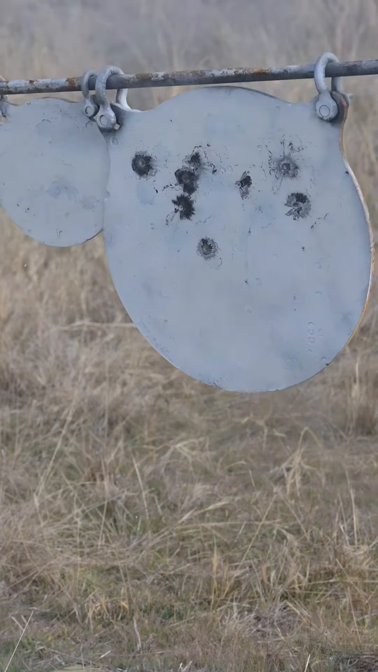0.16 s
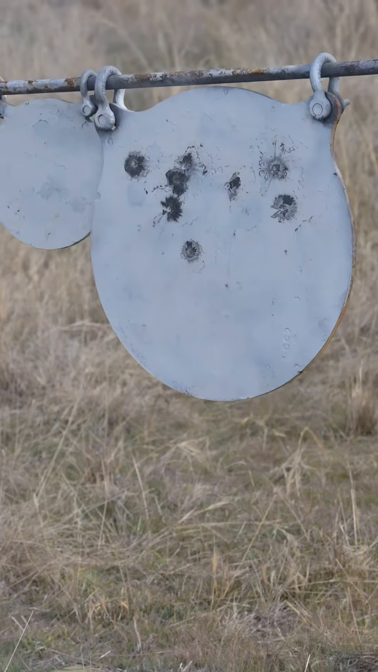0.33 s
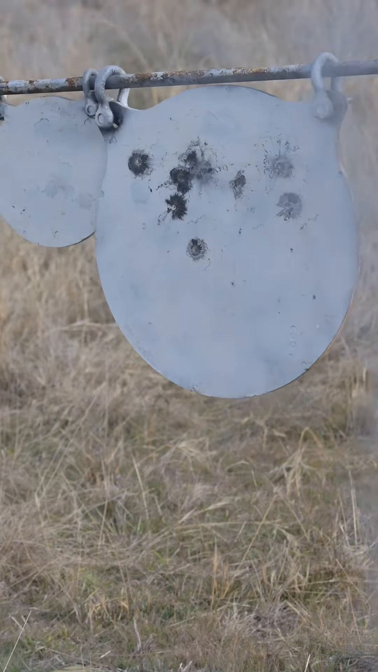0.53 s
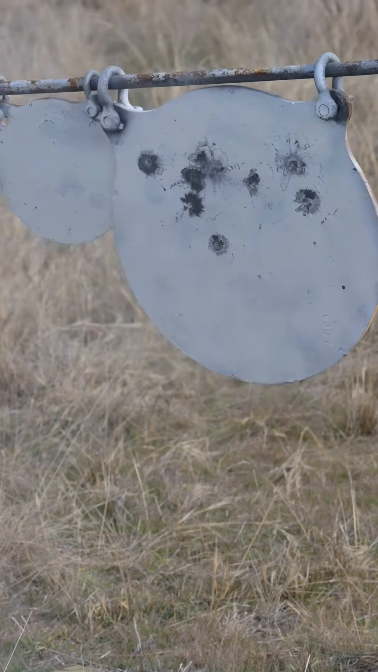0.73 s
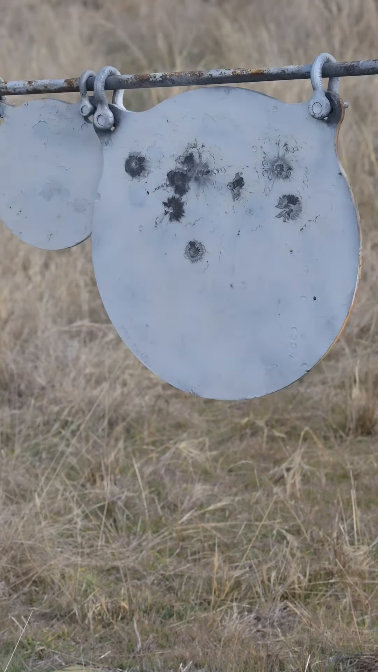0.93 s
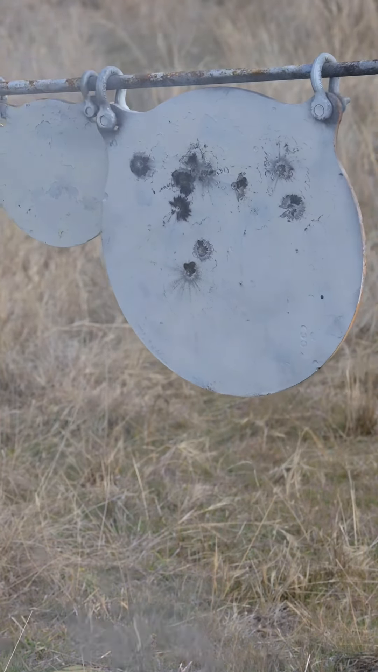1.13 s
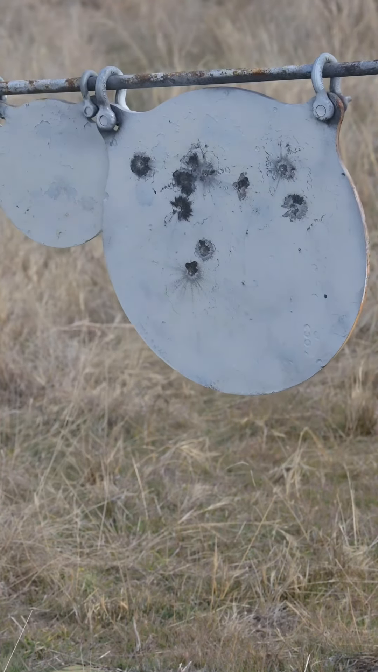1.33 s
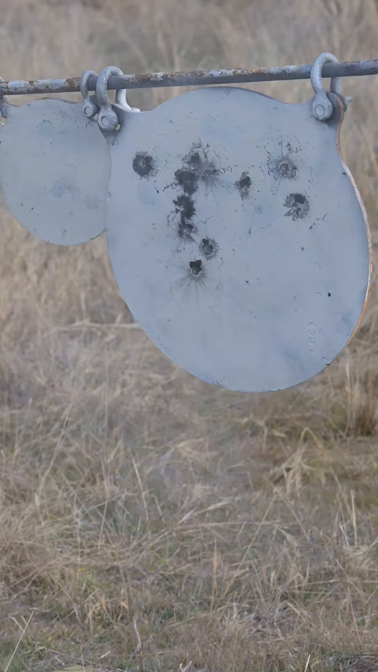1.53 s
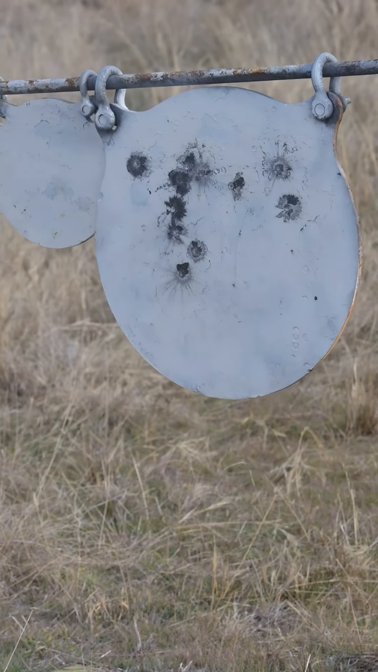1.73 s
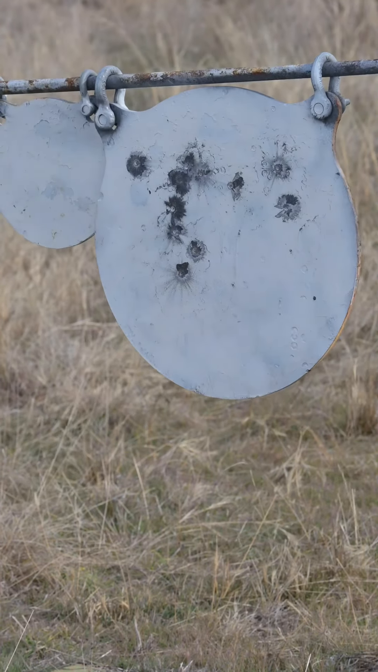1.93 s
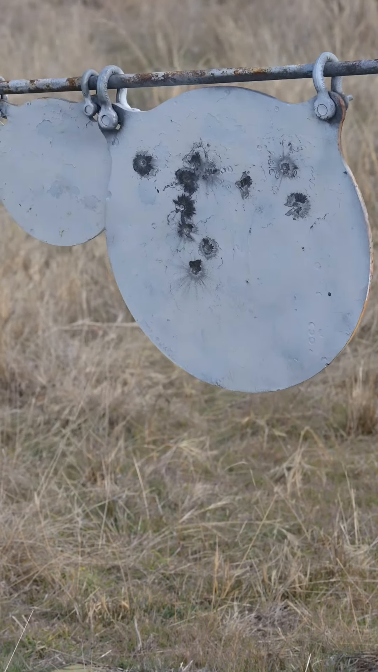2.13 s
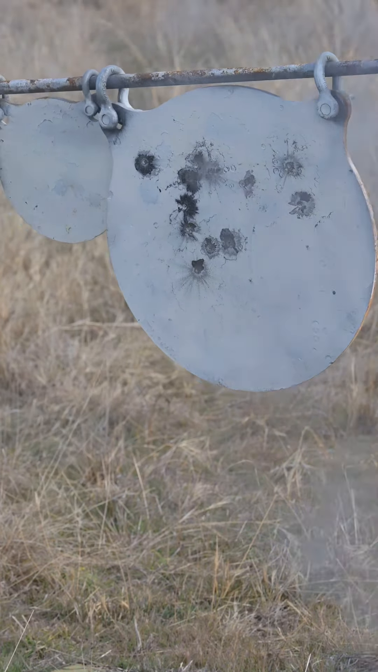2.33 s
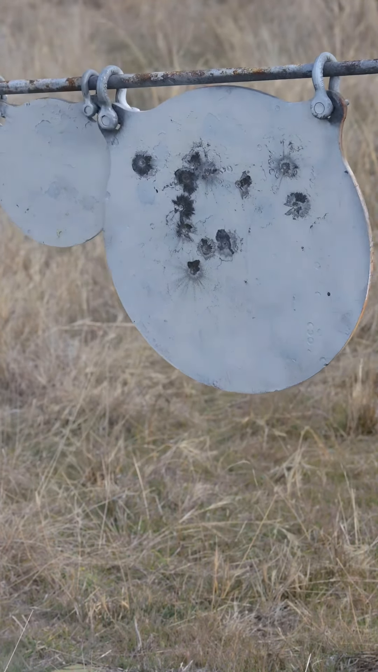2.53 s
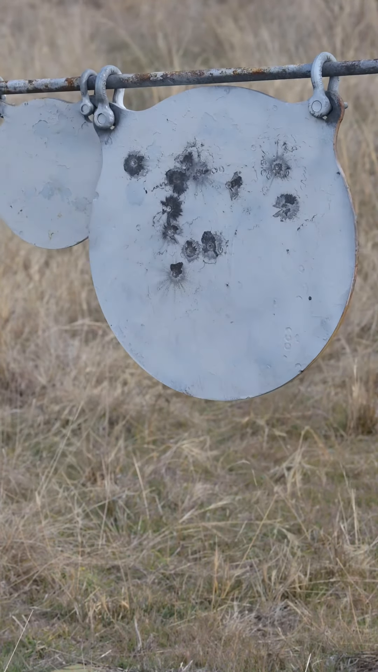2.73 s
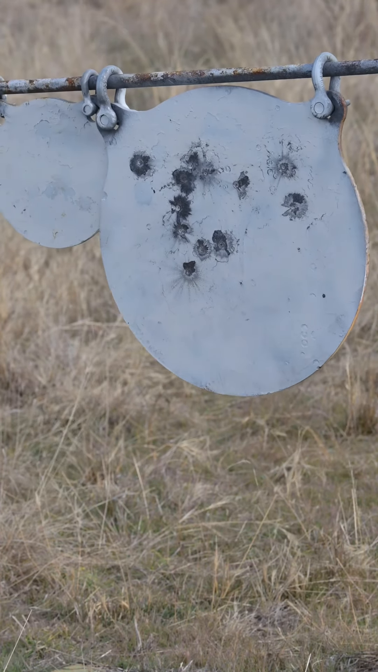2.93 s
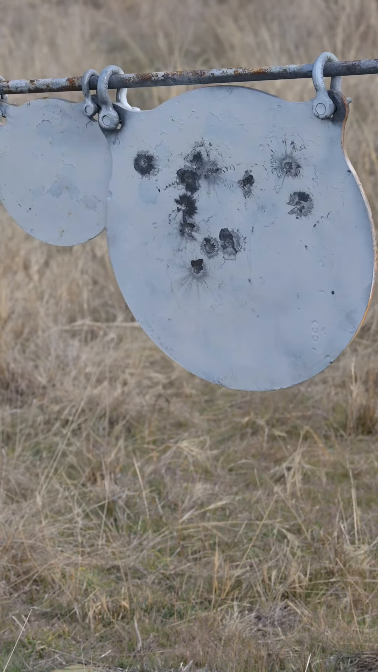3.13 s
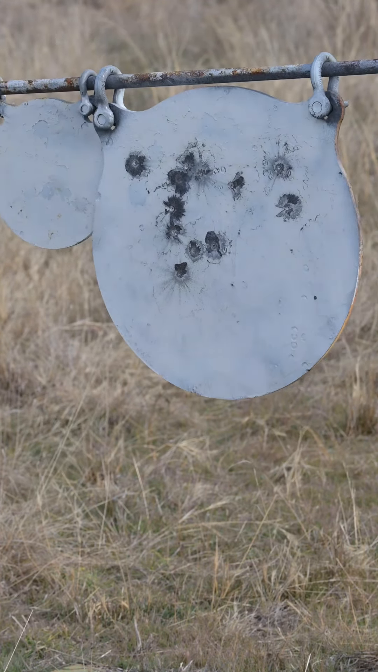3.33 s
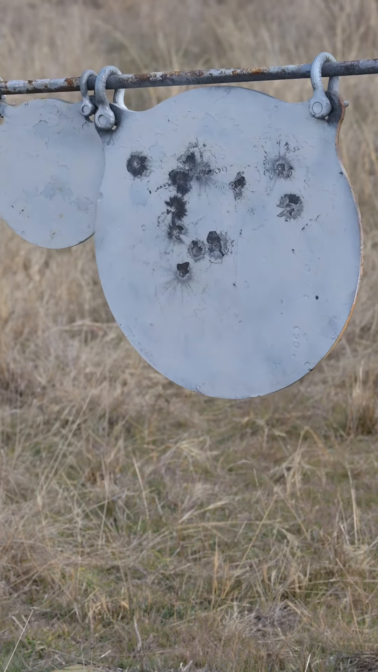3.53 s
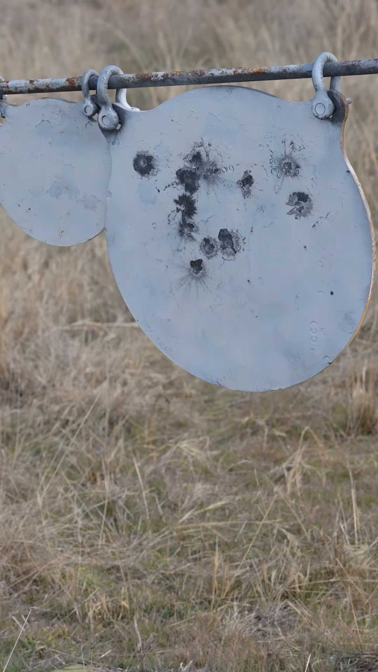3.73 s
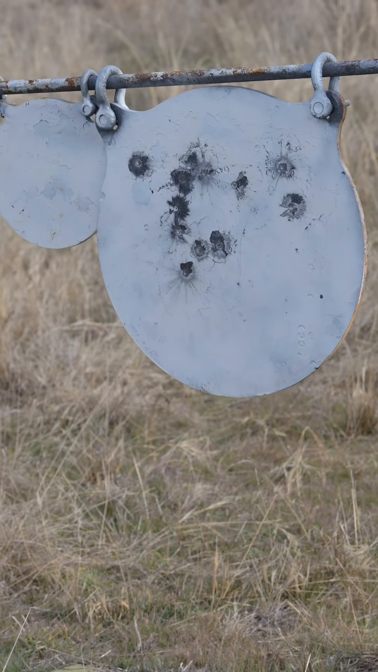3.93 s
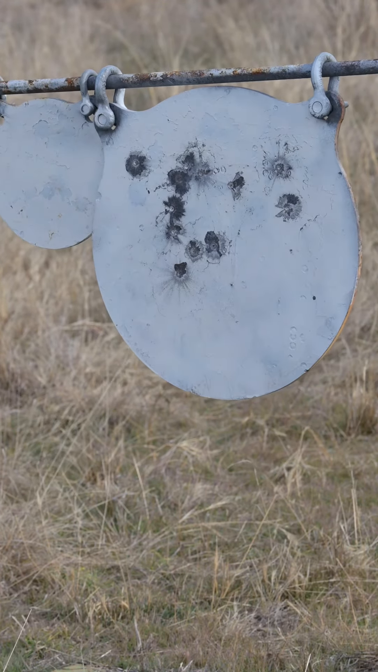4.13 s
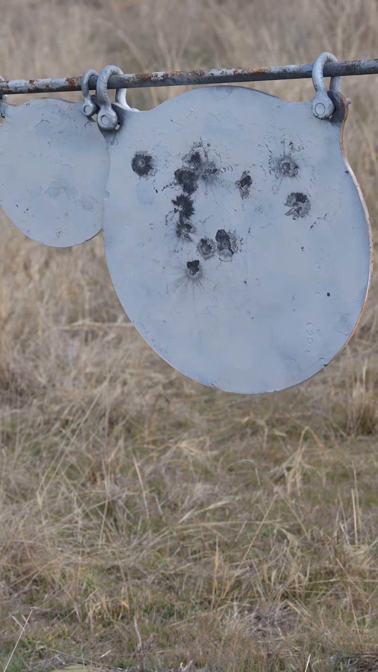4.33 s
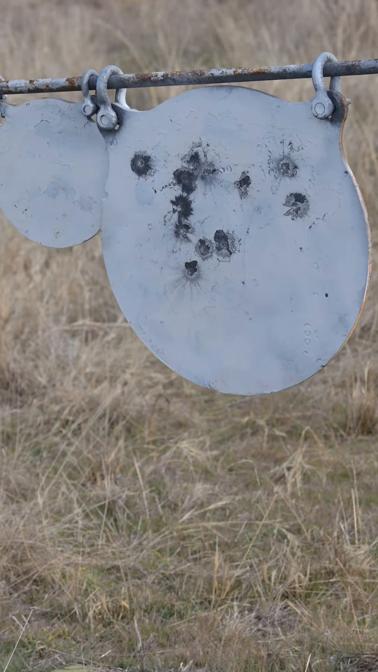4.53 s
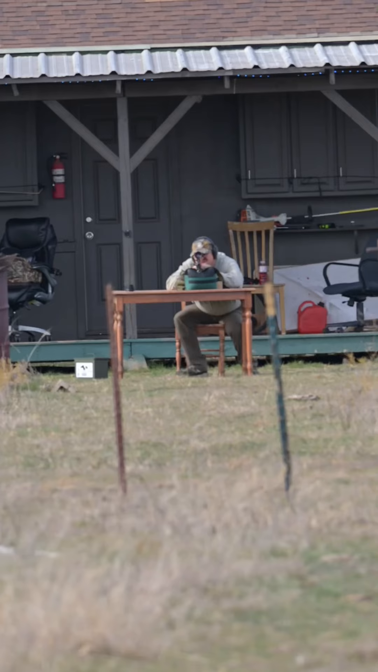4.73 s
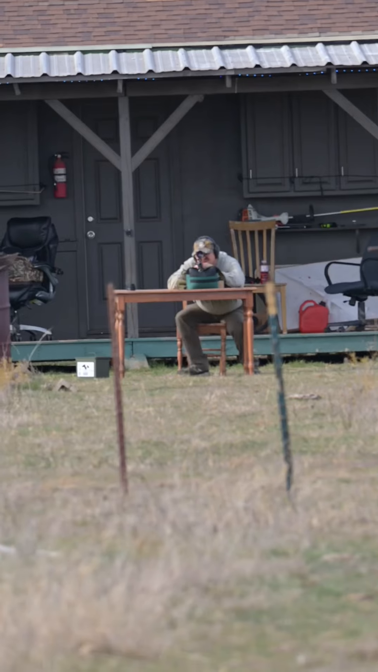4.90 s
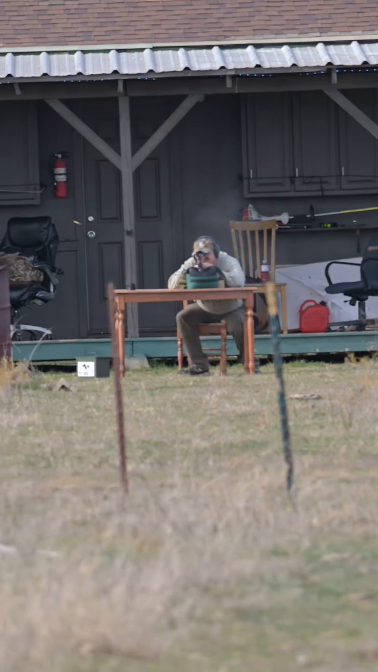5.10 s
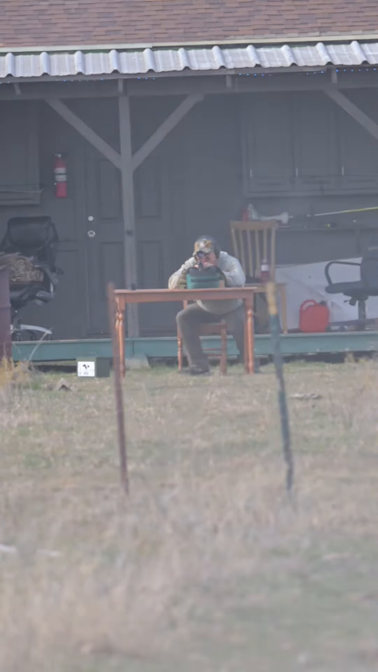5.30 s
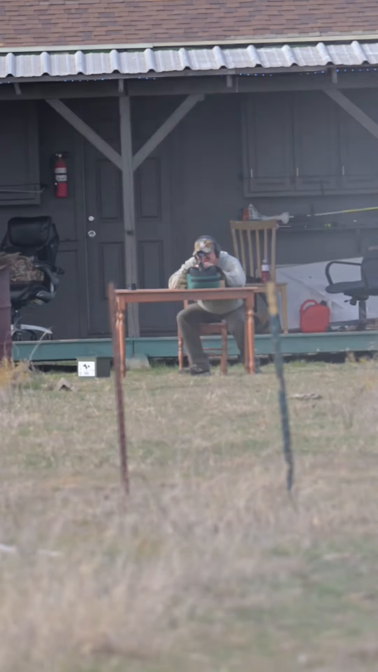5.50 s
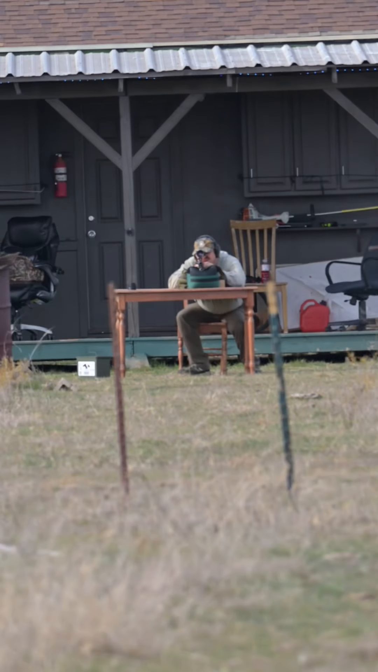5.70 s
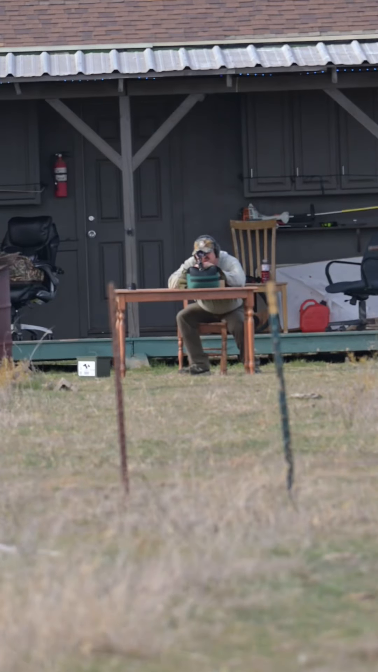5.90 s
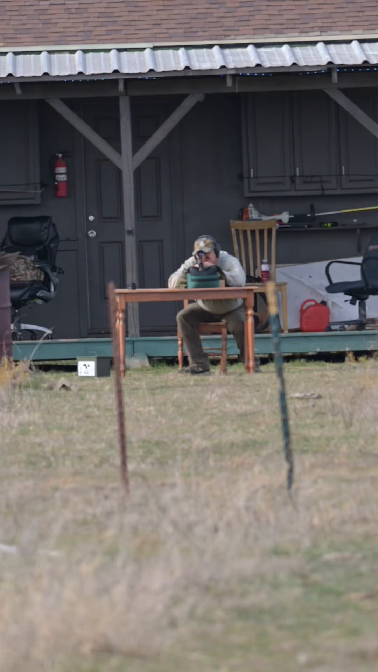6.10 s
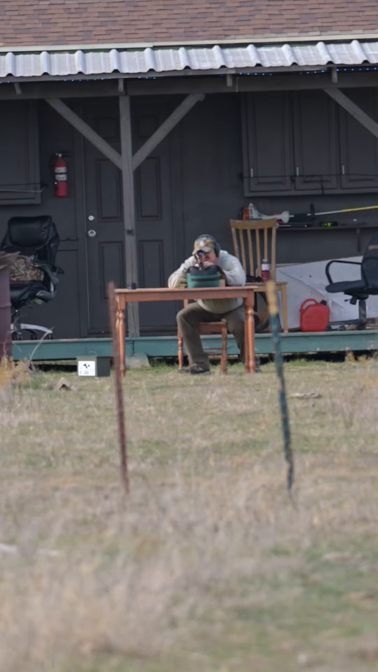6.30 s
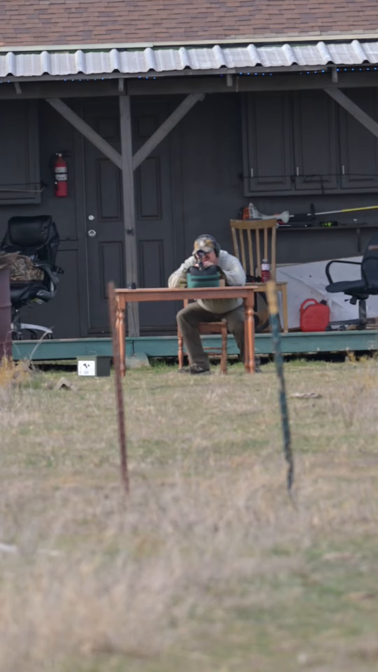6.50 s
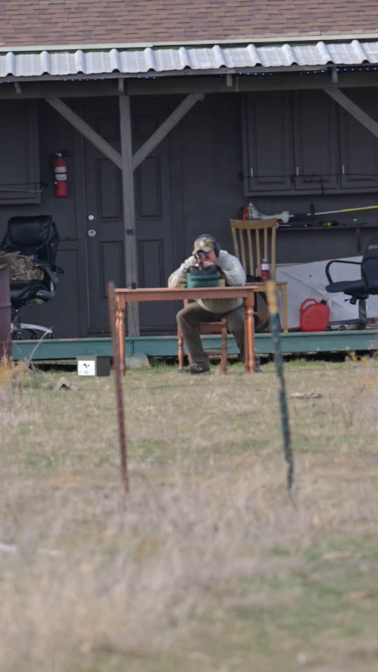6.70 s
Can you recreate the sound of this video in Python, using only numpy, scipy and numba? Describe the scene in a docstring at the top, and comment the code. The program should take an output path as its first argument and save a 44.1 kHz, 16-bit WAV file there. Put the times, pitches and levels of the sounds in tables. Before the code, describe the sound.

Close to hanging steel, supersonic cracks and bright metallic pings in quick string, shackles rattling, then a brief fade and one last long-ringing shot in wind.

```python
"""Rifle bullets on a hanging steel plate

Bullets strike a plate hung on shackles near a camera: shock-wave crack and lead splash are shaped noise and pulses,
the ring is a sum of decaying modes, and the far muzzle report follows with echoes.
The plate clanks in its shackles, fragments patter down, and low rumble and wind lie behind.
Hits overload the camera, whose gain control ducks and recovers, so the ring swells before it fades.
The background fades out and back in at a cut to another scene, windier, with one more hit.
"""
import sys
import numpy as np
from scipy import signal
from scipy.fft import rfft, irfft, next_fast_len
from scipy.io import wavfile
from scipy.ndimage import uniform_filter1d, map_coordinates
from numba import njit

SR = 44100
rng = np.random.default_rng(int(sys.argv[2]) if len(sys.argv) > 2 else 0)


def store_pcm(level_fs):
    """Save levels as 16-bit WAV."""
    pcm = np.round(np.clip(level_fs, -1, 1) * 32767).astype(np.int16)
    wavfile.write(sys.argv[1], SR, np.atleast_2d(pcm).T)


N = 297675
TIME = np.arange(N) / SR
AGE = TIME[:2 * SR]  # seconds since the onset of a sound
CUT_S = 4.81  # the cut between two scenes, where the background is faded out


def amp(db):
    """Level law: decibels to amplitude ratio."""
    return 10 ** (np.asarray(db) / 20)


def unit(x):
    """Normalization: x scaled to rms 1."""
    return x / np.sqrt(np.mean(x ** 2) + 1e-20)


def along(points, hz):
    """Logarithmic pitch scale: (Hz, value) points interpolated over log frequency."""
    f, v = np.transpose(points)
    return np.interp(np.log(hz + 1), np.log(f + 1), v)


def fade(t, t60):
    """Exponential decay: a loss of 60 dB in t60 seconds."""
    return np.exp(-np.log(1000) * t / t60)


def filtered(x, response):
    """Linear filtering: the spectrum of x times a response of frequency."""
    n = x.shape[-1]
    padded = next_fast_len(n + SR // 10)
    spectrum = rfft(x, padded) * response(np.fft.rfftfreq(padded, 1 / SR))
    return irfft(spectrum, padded)[..., :n]


def noise(spectrum, size):
    """Spectral shaping: white noise coloured by (Hz, dB) points, at rms 1."""
    return unit(filtered(rng.standard_normal(size), lambda hz: amp(along(spectrum, hz))))


def wobble(rate):
    """Slow random modulation: a smooth curve through random knots, rate of them a second."""
    return map_coordinates(rng.standard_normal(N // 100), [TIME * rate])


def add(track, s, sound):
    """Superposition: mix a sound into the track from time s."""
    start = max(round(s * SR), 0)
    track[start:start + len(sound)] += sound[:N - start]


def modes(hz, db, t60, t):
    """Modal synthesis: one decaying sine a row, at random phase."""
    phase = rng.uniform(0, 2 * np.pi, (len(hz), 1))
    return amp(db)[:, None] * fade(t, t60[:, None]) * np.sin(2 * np.pi * hz[:, None] * t + phase)


def cluster(hz, spectrum, scatter_db=5):
    """Modal density: one second of many undamped modes at random strengths, rms 1."""
    lines = np.zeros(SR // 2 + 1, complex)
    strength = amp(along(spectrum, hz) + scatter_db * rng.standard_normal(len(hz)))
    lines[hz.astype(int)] = strength * np.exp(2j * np.pi * rng.random(len(hz)))
    return unit(irfft(lines))


# Relative spectra of the low outdoor rumble and of the tree wind in the first scene and in the windier second scene.
# Each row: frequency in Hz, density in dB per Hz.
RUMBLE_SPECTRUM = [(13, -28.5), (22, 5), (108, 3), (160, -1), (247, -4.5), (309, -5.5), (420, -12),
                   (550, -40.5), (920, -120)]
CALM_SPECTRUM = [(210, -25), (350, -3.5), (424, -35), (445, -8.5), (482, -14), (719, -11.5), (791, -13),
                 (3730, -39.5), (11800, -37.5), (16000, -40.5)]
BREEZE_SPECTRUM = [(180, -86), (300, -58), (372, -17.5), (555, -17.5), (614, -6), (749, -8.5),
                   (1280, -12.5), (1970, -29.5), (3830, -37), (4160, -45), (6960, -40), (16000, -42.5)]


def air(rumble_db=-54, calm_db=-54.5, breeze_db=-48.5, gust_db=1.1, fade_out_s=0.15, fade_in_s=0.17):
    """Broadband noise: rumble and wind in distant trees, faded out at a scene cut and in with a windier scene."""
    rumble = amp(rumble_db + gust_db * wobble(21)) * noise(RUMBLE_SPECTRUM, N)
    calm = amp(calm_db) * noise(CALM_SPECTRUM, N)
    breeze = amp(breeze_db) * noise(BREEZE_SPECTRUM, N)
    trees = np.where(TIME < CUT_S, calm, breeze)
    fading = np.maximum((CUT_S - TIME) / fade_out_s, (TIME - CUT_S) / fade_in_s)
    return np.clip(fading, 0, 1) * (rumble + amp(gust_db * wobble(3)) * trees)


# The larger falling fragments.
# Each row: start in seconds, relative level in dB, centre frequency in Hz.
LARGE_FRAGMENTS = [(.517, -25, 624), (.933, -14.5, 2620), (1.361, -18, 2250), (1.944, -22.5, 1630),
                   (1.957, -22.5, 940), (2.237, -28.5, 1700), (2.851, -23, 1926), (5.656, -28, 3200),
                   (5.94, -25.5, 2680), (5.959, -28, 2620)]


def fragments(tick_db=-2, patter_db=-46, thinning_db_per_s=65, tick_t60=0.034, count=12):
    """Small-body impact: bits of bullet land as short noise bands, a patter fading after each hit, and single pieces."""
    out, t = np.zeros(N), AGE[:SR // 20]
    ticks = list(LARGE_FRAGMENTS)
    for s, db, *_ in SHOTS:
        for flight_s in rng.uniform(.08, .45, count):
            level = db + patter_db - thinning_db_per_s * flight_s + 4 * rng.standard_normal()
            ticks.append((s + flight_s, level, 1500 * np.exp(rng.standard_normal())))
    envelope = fade(t, tick_t60) * (1 - np.exp(-t / .0007))
    for s, db, hz in ticks:
        band = [(hz / 4, -22), (hz * .8, -2), (hz, 0), (hz * 1.3, -5), (hz * 2, -20), (hz * 4, -52)]
        add(out, s, amp(db + tick_db) * noise(band, len(t)) * envelope)
    return out


# Shackle clanks. Each row: start in seconds, relative level in dB, plate ring relative to that level in dB,
# time until the shackle falls back in seconds.
CLANKS = [(0.22, -7.5, -17, 0.068), (.333, -16, -16.5, 0.11), (0.358, -11.5, -37, 0.044),
          (.388, -11, -25, .02), (.558, -13, -25, 0.033), (.777, -8.5, -11.5, 0.068),
          (.951, -11, -16, 0.011), (1.284, -7.5, -12.5, 0.087), (1.789, -16, -26, 0.016),
          (2.084, -14, -17, 0.039), (2.537, -9, -16.5, 0.068), (2.696, -11.5, -23, 0.013),
          (3, -19.5, -18, 0.029), (3.112, -20, -33, 0.046), (3.214, -25.5, -37, 0.012),
          (3.309, -31.5, -33.5, .06), (3.687, -17.5, -23.5, 0.064), (4.341, -15.5, -19.5, 0.082),
          (5.473, -12.5, -42, 0.05), (5.694, -10.5, -38, .015), (5.712, -7, -45, 0.086),
          (6.144, -10, -52, 0.013), (6.228, -3.5, -25.5, 0.015), (6.329, -21, -17, 0.057)]
# Modes of bar and shackles. Each row: frequency in Hz, relative level in dB, t60 in seconds before a cap.
BAR_MODES = [(405, -23, 0.33), (624, -23.5, 0.036), (886, 0, 0.056), (1050, -2.5, 0.048), (1420, -19, 0.11),
             (1548, 5.5, 0.025), (1883, -10.5, 0.087), (2000, 4.5, 0.059), (2611, -37.5, 0.4),
             (3380, -37.5, 0.24), (3120, -11, 0.22), (3430, -24.5, 0.21), (4694, -33.5, 0.045),
             (5500, -28.5, 0.22)]
# Relative spectrum of the contact rattle. Each row: frequency in Hz, density in dB per Hz.
CLANK_SPECTRUM = [(71, -52), (120, -16), (1090, -5.5), (1230, -2), (1870, -5.5), (1990, -7.5), (2250, -7.5),
                  (3500, -6.5), (5140, -27.5), (6820, -16.5), (11500, -24.5), (15000, -32)]


def shackles(rattle_db=-12, bar_level_db=-14.5, jangle_db=-18, ring_db=3, dull_db=20, bright_db=-22, tilt_db=1,
             edge_hz=14000, treble_grows=0.69, mellow_db=-17, fall_db=-12.5, fall_grows=0.56, fall_ring_db=-28):
    """Contact excitation: each clank is a short rattle that rings bar and plate; hard ones wake plate overtones."""
    out, t = np.zeros(N), AGE[:SR * 2 // 5]
    bar_hz, bar_db, bar_t60 = np.transpose(BAR_MODES)
    hz, t60, _, plate_db, _ = np.transpose(PLATE_MODES)
    main_hz, over_main_db = hz[2], plate_db - plate_db[2]
    soft_db = over_main_db - dull_db * np.abs(np.log2(hz / main_hz)) - 10 * (hz < main_hz)
    jangle_hz = np.geomspace(330, 6500, 60) * rng.uniform(.97, 1.03, 60)
    # a shackle falls back mostly by its own weight, so its level follows the clank only in part
    falls = [(s + gap_s, fall_db + fall_grows * db, fall_ring_db) for s, db, _, gap_s in CLANKS]
    for s, db, sing_db in [row[:3] for row in CLANKS] + falls:
        # the shackle chatters within each contact
        bounce = np.maximum(t - rng.uniform(0.0043, 0.039), 0)
        contacts = fade(t, 0.058) + 0.15 * (bounce > 0) * fade(bounce, 0.036)
        rattle = amp(rattle_db) * noise(CLANK_SPECTRUM, len(t)) * contacts
        rattle += amp(jangle_db) * cluster(jangle_hz, CLANK_SPECTRUM)[:len(t)] * fade(t, 0.17)
        rattle = rattle * (1 - np.exp(-t / 0.00017))
        # a softer contact has less treble and a lower upper edge
        treble_db = np.clip(treble_grows * (db - mellow_db), -8, 5)
        rattle = filtered(rattle, lambda f: amp(treble_db / (1 + (3800 / (f + 1)) ** 4)))
        rattle = filtered(rattle, lambda f: 1 / np.sqrt(1 + (f / (edge_hz * amp(0.72 * db))) ** 6))
        bar_level = bar_db - bar_db.max() + 3 * rng.standard_normal(len(bar_hz))
        bar = modes(bar_hz, bar_level, np.minimum(bar_t60, .14), t).sum(0)
        bar = bar * (1 - np.exp(-t / 0.0012))
        # a harder blow is a shorter contact, so the overtones grow faster than the blow
        hard_db = bright_db + 3.5 * db + 0.12 * over_main_db - tilt_db * np.log2(hz / main_hz)
        level = np.maximum(soft_db + db + sing_db + ring_db, hard_db)
        level = level + 2 * rng.standard_normal(len(hz))
        ring = modes(hz, level, np.minimum(t60, .28), t).sum(0) * (1 - np.exp(-t / 0.0007))
        add(out, s, amp(db) * (rattle + amp(bar_level_db) * bar) + ring)
    return out


# Relative spectra of the muzzle report and its field echo. Each row: frequency in Hz, density in dB per Hz.
REPORT_SPECTRUM = [(30, -32.5), (90, -5), (200, -0.5), (600, -4.5), (1500, -9.5), (4000, -15.5),
                   (12000, -20.5)]
ECHO_SPECTRUM = [(30, -24), (100, -14.5), (250, -4), (700, -6.5), (2500, 1.5), (5000, -8), (12000, -29.5)]
# Reverberation of the field. Each row: frequency in Hz, t60 in seconds.
FIELD_DECAY = [(100, 9.6), (700, 0.84), (2500, 1.8), (10000, 0.092)]


def reports(delay_s=.08, echo_db=-36, roll_db=-53.5, roll_delay_s=.72, roll_width_s=0.4, roll_grows=0.25):
    """Propagation delay and reverberation: the blast trails the bullet, rolls round the field, returns as a low swell."""
    out, t = np.zeros(N), AGE[:SR // 2]
    for hit_s, _, _, db, *_ in SHOTS:
        s = hit_s + delay_s
        blast = noise(REPORT_SPECTRUM, len(t)) * fade(t, 0.2) * (1 - np.exp(-t / 0.0046))
        add(out, s, amp(db - 23) * blast)
        # each frequency band of the echo decays at its own rate
        hz, age, bands = signal.stft(noise(ECHO_SPECTRUM, len(AGE)), SR, nperseg=256)
        bands = bands * fade(age, along(FIELD_DECAY, hz)[:, None])
        tail = signal.istft(bands, SR, nperseg=256)[1][:len(AGE)]
        # trees and walls answer in uneven lumps
        tail = tail * amp(3.2 * wobble(40)[:len(AGE)])
        add(out, s, amp(echo_db) * tail * (1 - np.exp(-AGE / 0.12)))
        swell = np.exp(-((AGE - roll_delay_s) / roll_width_s) ** 2)
        add(out, s, amp(roll_db + roll_grows * db) * swell * noise(RUMBLE_SPECTRUM, len(AGE)))
    return out


# Plate modes. Each row: frequency in Hz, basic t60 in seconds, relative level in dB when struck at spot 0, 1, 2.
PLATE_MODES = [(1223, 0.36, -40, -35, -26), (1947, 0.51, -52, -44, -49), (2009.5, 0.51, -35, -26, -32),
               (2876, 0.29, -43, -42, -46), (3181, 0.21, -19, -25, -38), (3460, 0.23, -25, -28, -36),
               (4687, 0.19, -33, -28, -41), (4991, 0.18, -22, -34, -40), (5890, 1.4, -68, -66, -72),
               (6210, 0.25, -36, -33, -46), (6278, 0.25, -36, -33, -46), (6826, 0.27, -32, -37, -42),
               (7751, 0.33, -40, -35, -36), (7906, 0.36, -38, -37, -36), (8228, 0.55, -40, -54, -44),
               (8411, 0.55, -42, -53, -38), (8516, 0.51, -43, -57, -44), (9471, 0.27, -33, -35, -35),
               (9765, 0.3, -32, -38, -35), (10194, 0.32, -32, -39, -32), (10571, 0.38, -36, -40, -39),
               (10850, 0.34, -37, -41, -38), (11179, 0.2, -32, -37, -21), (11393, 0.21, -34, -40, -26),
               (11730, 0.24, -34, -42, -31), (11872, 0.24, -35, -43, -34), (12346, 0.26, -36, -42, -35),
               (12806, 0.3, -42, -48, -36), (12915, 0.3, -36, -43, -30), (13242, 0.29, -40, -47, -27),
               (14984, 0.33, -44, -51, -38), (15172, 0.34, -45, -52, -41), (15353, 0.36, -46, -53, -39)]
# Balance of the plate's many weak overtones. Each row: frequency in Hz, relative level in dB.
FINE_BALANCE = [(2500, 0.5), (3500, -0.5), (5000, -5.5), (7000, -1.5), (10000, 0.5), (13000, -1.5),
                (15500, -9)]


def plate(ring_db=-1, high_db=4, scatter_db=4.0, fine_db=-23.0, fine_t60=0.21, lingering_db=-25,
          damping_tilt=.7, low_life_power=1.5):
    """Modal excitation: the strike spot decides how strongly modes ring; shackles damp them as the plate swings up."""
    out, t = np.zeros(N), AGE[:SR]
    hz, t60, *spots = np.transpose(PLATE_MODES)
    family = np.digitize(hz, [1500, 2500])  # 0 lowest mode, 1 main modes, 2 overtones
    overtone = family == 2
    for s, db, _, _, spot, low_db, main_db, life, damp_s, damp_db in SHOTS:
        level = spots[int(spot)] + np.array([low_db, main_db, high_db])[family]
        level = level + scatter_db * rng.standard_normal(len(hz)) * overtone
        # low modes move the rim most: they gain most when the plate swings free and lose most when it is caught
        free_t60 = t60 * life ** np.where(overtone, 1, low_life_power)
        caught = np.clip((t - damp_s) / 0.036, 0, 1)
        damping = damp_db * (2000 / hz[:, None]) ** damping_tilt * caught
        # the overtones of a disc come in close pairs that beat
        beat_hz = rng.uniform(2, 12, (len(hz), 1))
        beats = 1 + .45 * overtone[:, None] * np.sin(2 * np.pi * beat_hz * t)
        ring = (modes(hz, level, free_t60, t) * beats * amp(-damping)).sum(0)
        add(out, s, amp(db + ring_db) * ring)
        fine_hz = np.geomspace(2600, 15300, 56) * rng.uniform(.975, 1.025, 56)
        add(out, s, amp(db + fine_db) * cluster(fine_hz, FINE_BALANCE) * fade(t, fine_t60 * life ** 0.31))
    # the main mode still sings from an earlier hit
    add(out, 0, amp(lingering_db) * np.sin(2 * np.pi * hz[2] * t) * fade(t, 1.0))
    return out


# Bullet hits. Each row: start in seconds, strength in dB, lead of the crack in seconds, relative report level in dB,
# strike spot 0 to 2, lowest-mode gain in dB, main-mode gain in dB, ring life factor,
# time until the shackles damp the ring in seconds, damping at 2 kHz in dB.
SHOTS = [(0.0277, 25, .0092, -0.5, 0, 1.5, 3.5, 1.043, .18, 5),
         (0.5921, 29, 0.008, -11, 1, 8, 7, 1.06, .18, 6.5),
         (1.032, 26.5, 0.0078, 3, 1, 8, 4, 1.075, .19, 4),
         (1.451, 29, 0.0074, -10.5, 1, -12.5, 5, 1.45, 0.19, 24),
         (2.3623, 27, 0.0095, 4.5, 0, 0, -8, 1.104, .2, 0.5),
         (5.1513, 31.5, 0.00013, 32.5, 2, 0, 0.5, 1.985, .38, 16)]
# Relative spectra of the bursting bullet and of its spray. Each row: frequency in Hz, density in dB per Hz.
SPLASH_SPECTRUM = [(24, -46), (40, -12.5), (342, -17.5), (1250, -7.5), (1640, -8), (3220, -5.5),
                   (3930, -14.5), (5580, -13.5), (9650, -13.5), (14400, -21), (15500, -29.5)]
SPRAY_SPECTRUM = [(60, -24.5), (200, -6.5), (500, -9), (1200, 4), (3200, 1), (5000, -4.5), (10000, -17),
                  (15500, -25)]


def bullets(crack_db=27.5, bounce_db=-8, spray_db=-23, grain_db=3.5, push_db=-7, thump_hz=118, spray_grows=0.28):
    """Shock wave and impact: a pressure pulse passes and scatters off the ground; the bullet bursts on the steel."""
    out, t = np.zeros(N), AGE[:SR * 3 // 4]
    for s, db, lead_s, *_, life, _, _ in SHOTS:
        u = t / 0.00045  # time in pulse lengths
        add(out, s - lead_s, amp(crack_db) * (1 - u) * np.exp(-u))
        scatter = noise(SPLASH_SPECTRUM, len(t)) * fade(t, 0.019)
        add(out, s - lead_s + 0.0029, amp(crack_db + bounce_db) * scatter)
        add(out, s, amp(db) * noise(SPLASH_SPECTRUM, len(t)) * fade(t, 0.036))
        # a low push trails the shock wave
        add(out, s, amp(crack_db + push_db) * np.sin(2 * np.pi * thump_hz * t) * fade(t, 0.025))
        # lead spray hisses unevenly through the grass
        grain = amp(grain_db * wobble(130)[:len(t)])
        spray = grain * noise(SPRAY_SPECTRUM, len(t)) * fade(t, 0.28 * life ** 0.45)
        add(out, s, amp(db + spray_db + spray_grows * (db - 35.5)) * spray)
    return out


def scene():
    """Superposition: all sources sum and reach the two close microphone ports alike."""
    sound = air() + fragments() + shackles() + reports() + plate() + bullets()
    return np.array([sound, sound])


@njit
def duck(excess, attack, release):
    """Dynamic compression: gain reduction in dB chases the excess quickly and lets go at a limited rate."""
    out, held = np.zeros(len(excess)), 0.0
    for i in range(len(excess)):
        if excess[i] > held:
            held += (excess[i] - held) * attack
        else:
            held = max(held - release[i], excess[i])
        out[i] = held
    return out


def record(dry, threshold_db=-15.0, attack_s=0.005, early_release=260, late_release=115, ceiling=0.65, side_db=-22,
           low_cut_hz=32, top_hz=15900):
    """Compression, saturation and band limiting: gain control, overload, a trace of width rising with frequency."""
    power = np.abs(uniform_filter1d(dry[0] ** 2, size=64))
    excess = np.maximum(10 * np.log10(power + 1e-12) - threshold_db, 0)
    # release in dB a second, slower in the second scene, with the camera moved
    release = np.where(TIME < CUT_S, early_release, late_release) / SR
    ducked = dry * amp(-duck(excess, 1 / (attack_s * SR), release))
    clipped = ducked / (1 + np.abs(ducked / ceiling) ** 6) ** (1 / 6)
    # the side signal is a quarter cycle out of phase with the middle
    side = filtered(clipped[0], lambda hz: 1j * amp(side_db) * np.sqrt((hz + 500) / 9000))
    wide = clipped + np.array([side, -side])
    return filtered(wide, lambda hz: 1j * hz / (1j * hz + low_cut_hz) / (1 + (hz / top_hz) ** 80))


dry = scene()
out = record(dry)
store_pcm(out)
```